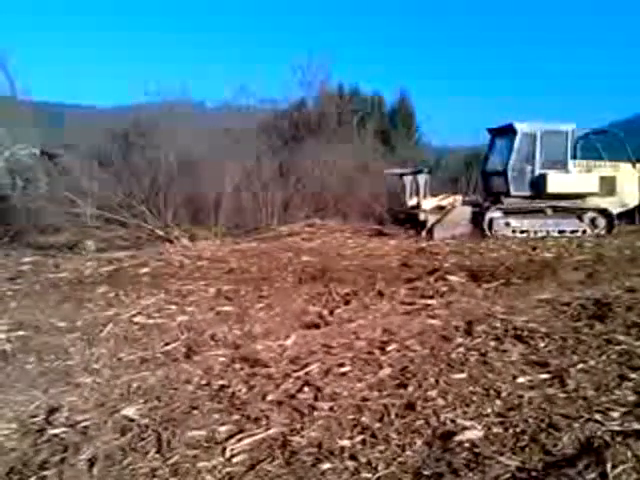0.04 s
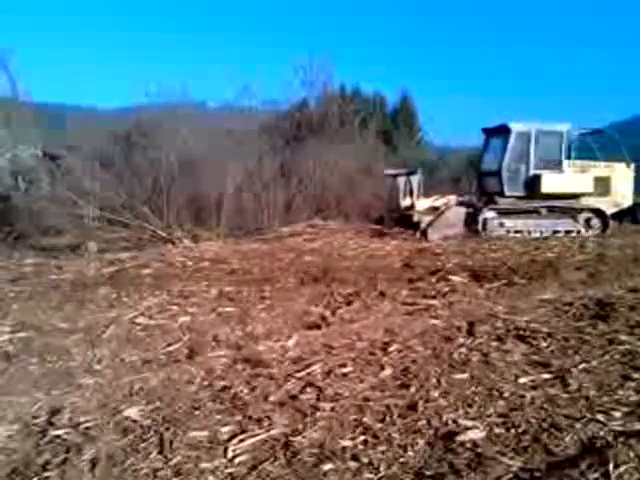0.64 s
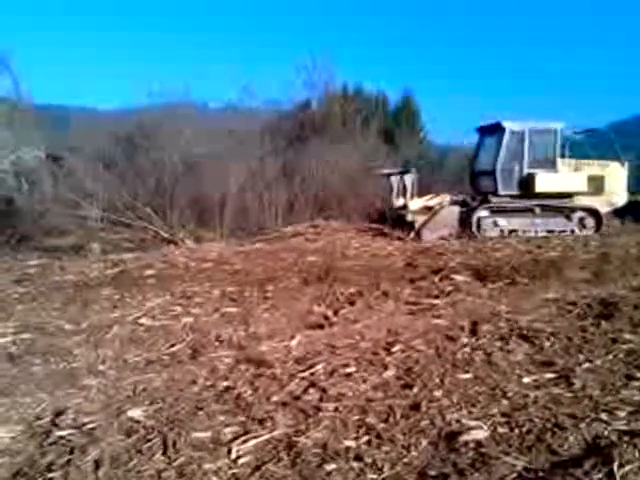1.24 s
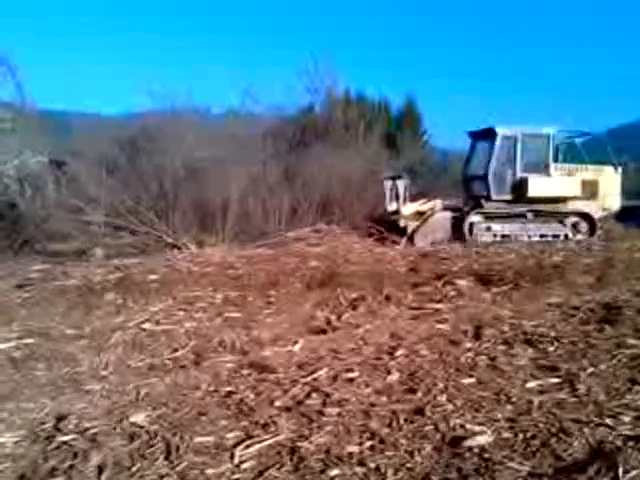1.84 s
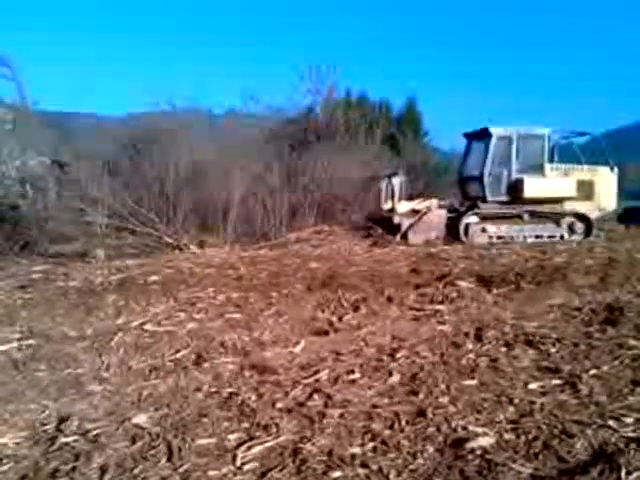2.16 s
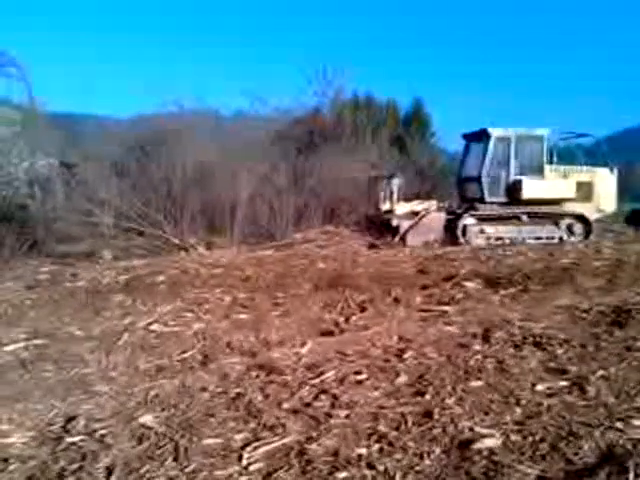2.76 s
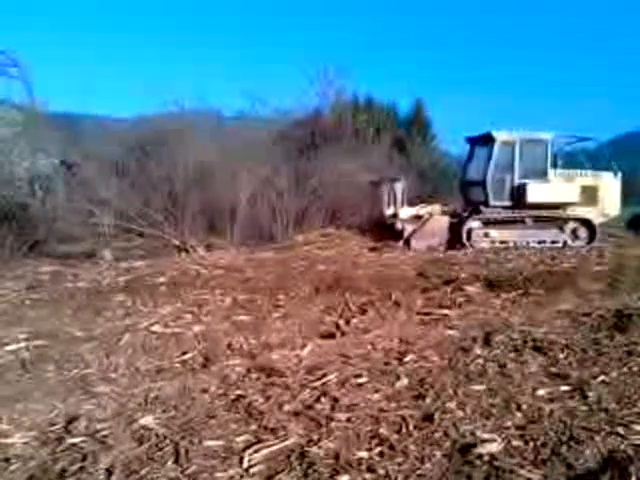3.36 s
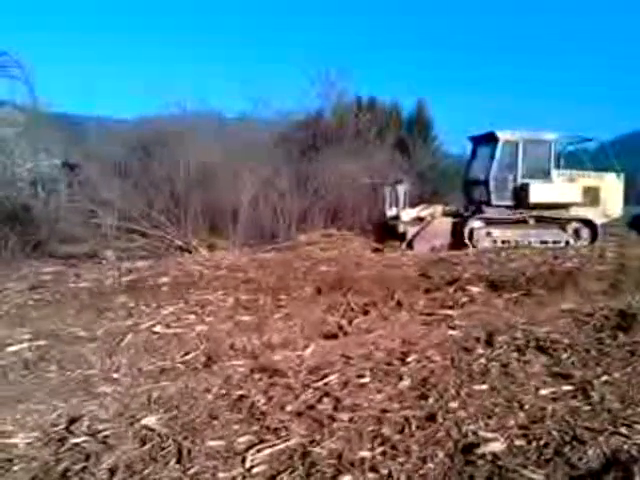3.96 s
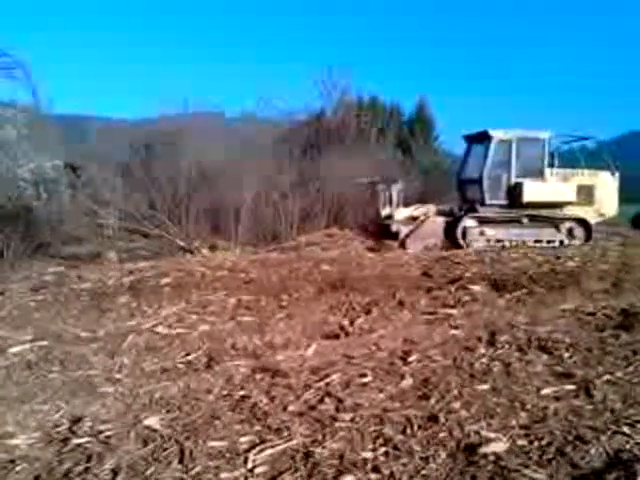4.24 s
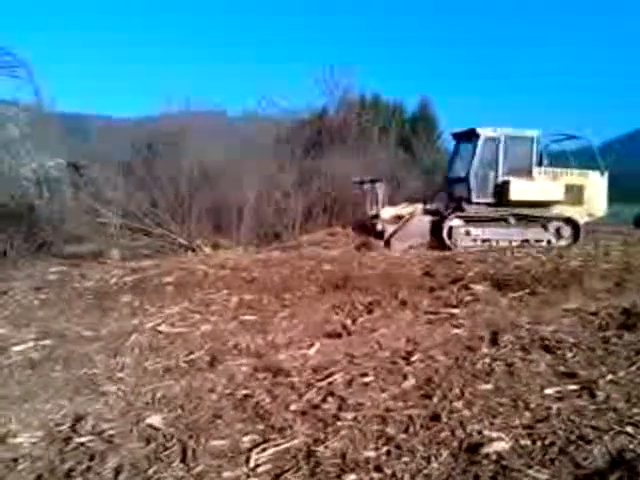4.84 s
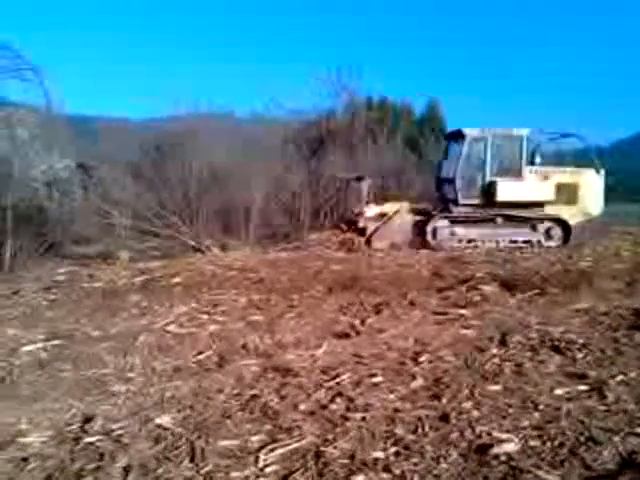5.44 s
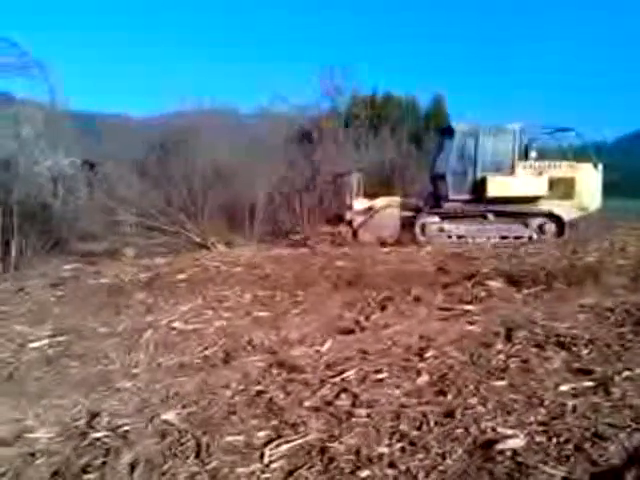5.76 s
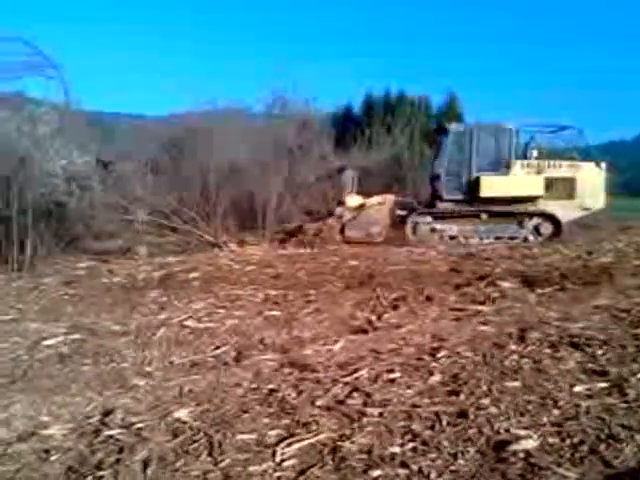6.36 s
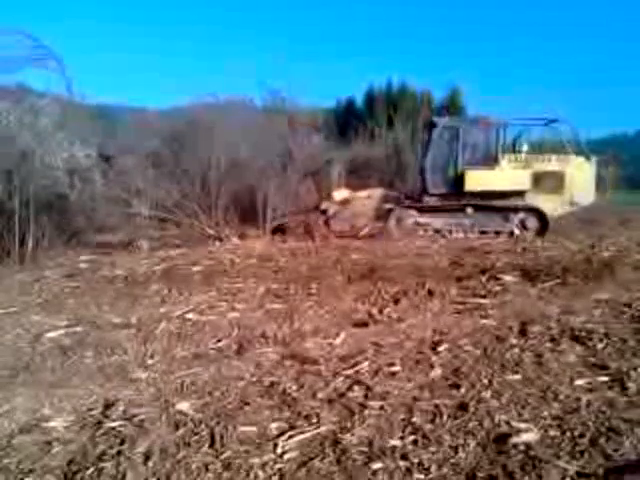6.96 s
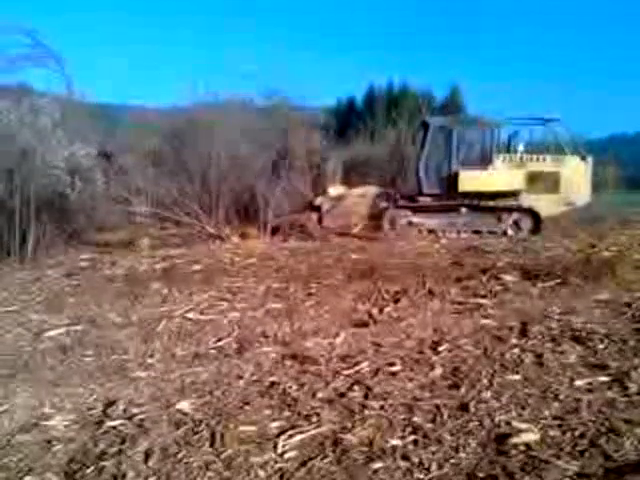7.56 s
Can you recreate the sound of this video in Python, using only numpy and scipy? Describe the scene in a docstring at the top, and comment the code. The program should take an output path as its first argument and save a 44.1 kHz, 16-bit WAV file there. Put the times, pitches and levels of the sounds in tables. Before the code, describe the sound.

Heard from a distance outdoors, a heavy diesel mulcher roars continuously while chewing wood into crackling, clattering chips. After a flurry of sharp snaps the engine bogs down, climbs back to speed, then drops again. A second heavy cluster of cracks and faint groaning stems follow, and the engine ends low and straining. The microphone sounds telephone-like, with brief fizz on the loudest cracks.

```python
"""A tracked forestry mulcher grinding brush, heard from some way off across an open field.
Its teeth shred wood in a dense crackle with single sharp cracks; loose pieces clatter and thick
stems groan under the hood. Behind that the six-cylinder diesel drones and sags as the rotor bites,
and the cooling fan, geared to the crank, sings along. One microphone, narrow-band: above about
4 kHz are a trace of hiss and brief ticks and fizz of recorder distortion at the loudest cracks."""
import sys
import numpy as np
from scipy import signal
from scipy.fft import rfft, irfft
from scipy.io import wavfile

SR = 44100
rng = np.random.default_rng(int(sys.argv[2]) if len(sys.argv) > 2 else 0)


def dump_mix(stems):
    """Bounce the given channels to the path in sys.argv[1] as a 16-bit WAV at rate SR."""
    frames = np.atleast_2d(stems).T  # one column per channel
    limited = np.clip(frames, -1, 1)  # hard clip at full scale
    pcm = np.round(limited * 32767).astype(np.int16)
    wavfile.write(sys.argv[1], SR, pcm)


N = 334719
TIME = np.arange(N) / SR
LOUD_DRONE_DB = -19.5   # reference level of the low drone

# Wood cracking against the teeth. Each row: start in seconds, level in dB, ring of the stem in Hz,
# level of the recorder's treble distortion in dB.
STEM_CRACKS = [(0.5005, -15, 1510, -80), (1.1466, -10, 1960, -78), (1.166, -8.5, 2150, -79),
               (1.174, -13, 2900, -80), (1.1998, -9, 2850, -80), (1.4738, -12, 1560, -80),
               (1.8617, -15, 1460, -82), (2.127, -5, 2130, -50), (2.1507, -7, 2260, -41),
               (2.177, -3, 2260, -39), (2.1915, -13, 2630, -51), (2.212, -7, 1990, -76),
               (2.2865, -9.5, 3020, -77), (2.3787, -10, 1980, -79), (2.4571, -8, 2150, -34.5),
               (2.4655, -17, 3000, -47), (2.4818, -8, 3060, -56), (2.5005, -6, 2000, -64),
               (2.525, -7.5, 1900, -71), (2.586, -5, 1900, -77), (2.6046, -10, 1950, -71),
               (2.6145, -10, 3220, -66), (2.65, -7, 2240, -59.5), (2.68, -10, 2200, -43),
               (2.689, -8, 2000, -42.5), (2.92, -13.5, 3420, -74), (2.973, -11, 2070, -74),
               (3.015, -19, 2110, -80), (3.2913, -16, 1510, -87), (4.476, -9, 2050, -44),
               (4.51, -16, 2100, -47), (4.518, -17, 2100, -47), (4.5286, -5, 2030, -44),
               (4.5595, -5.5, 2180, -69), (4.5929, -9, 2070, -83.5), (4.621, -5, 2300, -84.5),
               (4.8164, -10.5, 2180, -86), (5.0927, -8.5, 2500, -87), (5.2113, -5.5, 3060, -68),
               (5.2152, -6, 1400, -72), (5.4884, -7, 2110, -73), (5.574, -7, 2180, -55),
               (5.608, -10, 2286, -41), (5.618, -11, 2300, -48), (5.6336, -9, 1830, -44),
               (5.651, -10, 2220, -55), (5.748, -10, 2400, -55), (5.7655, -8, 2240, -61),
               (5.8767, -8.5, 1980, -45), (5.887, -14, 2200, -43), (5.9043, -6, 2240, -42),
               (5.9342, 0, 2900, -33), (5.9433, -15, 3680, -48), (5.952, -5, 2280, -51),
               (5.9707, -6, 2310, -46), (5.998, -10, 2800, -46), (6.017, -10, 3020, -61),
               (6.0303, -9, 2350, -58), (6.174, -11, 2000, -72), (6.191, -5, 1390, -77),
               (6.221, -10, 2300, -72), (6.312, -18, 2210, -80), (6.551, -8.5, 1200, -83)]


def from_db(db):
    """Decibels to gain."""
    return 10 ** (np.asarray(db) / 20)


def rms_one(x):
    """Scale to an rms of 1."""
    return x / np.sqrt(np.mean(x ** 2) + 1e-20)


def in_time(rows):
    """Join rows of (seconds, value) into a curve with a value for every sample."""
    return np.interp(TIME, *np.transpose(rows))


def drift(rate):
    """A smooth random wander of spread 1 that changes about `rate` times a second."""
    step, settle = 40, 2000
    pole = np.exp(-2 * np.pi * step * rate / SR)
    noise = rng.standard_normal(N // step + settle + 2)
    slow = signal.lfilter([1], [1, -2 * pole, pole * pole], noise)[settle:]
    return np.interp(np.arange(N) / step, np.arange(len(slow)), rms_one(slow))


def coloured(x, spectrum, size=8192):
    """Give a signal a spectrum through a causal (minimum-phase) filter; rms 1."""
    hz, db = np.transpose(spectrum)
    grid = np.maximum(np.arange(size // 2 + 1) * SR / size, 1)
    gain = from_db(np.interp(np.log(grid), np.log(hz), db))
    cepstrum = irfft(np.log(gain))[:size // 2]
    cepstrum[1:] *= 2
    impulse = irfft(np.exp(rfft(cepstrum, size)))
    return rms_one(signal.fftconvolve(x, impulse)[:N])


def ring(clicks, hz, t60):
    """A unit click sets a sine of height 1 ringing; it falls 60 dB in t60 seconds."""
    r, w = from_db(-60 / (t60 * SR)), 2 * np.pi * hz / SR
    return signal.lfilter([0, np.sin(w)], [1, -2 * r * np.cos(w), r * r], clicks + 1e-18)


def ground_dip(x, hz=2610, width_hz=260, depth=0.58):
    """Sound off the ground meets the direct sound at the microphone and hollows out one treble band."""
    return x - depth * signal.lfilter(*signal.iirpeak(hz, hz / width_hz, fs=SR), x)


def narrow_band(x, edge_hz=3798, rate_hz=8000, smoothing_hz=3880, ceiling=.6):
    """The recorder's telephone-wide band: highest peaks flattened, top mirrored faintly past the edge."""
    band = signal.sosfilt(signal.butter(30, edge_hz, fs=SR, output="sos"), x)
    mirrored = np.clip(band, -ceiling, ceiling) * (1 + 2 * np.cos(2 * np.pi * rate_hz * TIME))
    smoothing = signal.firwin(115, smoothing_hz, window=("kaiser", 6), fs=SR)
    return signal.fftconvolve(mirrored, smoothing, "same")


def distortion(delay_s=0.0018, tick_s=0.00054, fizz_db=-10, fade_s=.016, tone_hz=6000, tone_t60=0.00096):
    """Brief treble ticks and fizz of recorder distortion at the loudest cracks."""
    out, t = np.zeros(N), TIME[:SR // 10]
    ragged = rms_one(from_db(-drift(200)))
    treble = signal.butter(8, [4300, 8000], "band", fs=SR, output="sos")
    for start, _, _, db in STEM_CRACKS:
        span = slice(int(start * SR), int(start * SR) + len(t))
        hz = tone_hz * (1 + 0.12 * rng.uniform(-1, 1))
        tinted = ring(rng.standard_normal(2 * len(t)), hz, tone_t60)
        hiss = rms_one(signal.sosfilt(treble, tinted)[len(t):])
        tick = np.exp(-((t - delay_s) / tick_s) ** 2)
        fizz = from_db(fizz_db) * np.minimum(t / delay_s, 1) * np.exp(-t / fade_s) * ragged[span]
        out[span] += from_db(db) * (tick + fizz) * hiss
    return out


def faint_hiss(work_db, hiss_db=-77, follows=0.62, flicker_db=2.5):
    """A faint hiss above the main band rises with the work."""
    # Colour of the hiss. Each row: frequency in Hz, relative level in dB.
    spectrum = [(3000, -9.5), (4600, -2), (5300, 3), (6200, -5.5), (9000, -4), (11500, -1.5), (13800, 2.5),
                (15500, 0.5)]
    level_db = hiss_db + follows * (work_db - np.mean(work_db)) + flicker_db * drift(40)
    return from_db(level_db) * coloured(rng.standard_normal(N), spectrum)


def rumble(drone_db, level_db=-27.0, follows=0.22):
    """Low rush of exhaust gas, rotor and tracks, swelling a little with the drone."""
    # Colour of the rush. Each row: frequency in Hz, relative level in dB.
    spectrum = [(20, -25), (45, -7), (70, -4.5), (110, -0.5), (150, 2), (190, -4), (225, -11.5),
                (290, -4.5), (400, -3), (520, -2.5), (800, -15), (2000, -41.5)]
    gain = from_db(level_db + follows * (drone_db - LOUD_DRONE_DB))
    return gain * coloured(rng.standard_normal(N), spectrum)


def roar(firings, rotor_octaves, base_db=-19.0, db_per_octave=12, throb_db=0.5, flutter_db=0.62):
    """Combustion clatter swells with every firing and rings in the engine housing."""
    # Resonances of the housing. Each row: frequency in Hz, relative level in dB.
    housing = [(150, -34.5), (350, -9.5), (480, -5.5), (600, -7), (720, -3), (850, 0.2), (1020, -4),
               (1230, -6.5), (1430, -4.5), (1700, -9.5), (2000, -5.5), (4000, -16.5)]
    approach_db = 0.3945 * TIME   # the machine creeps towards the microphone
    level_db = base_db + db_per_octave * rotor_octaves + approach_db
    beat = from_db(throb_db * np.cos(2 * np.pi * firings) + flutter_db * drift(26))
    return from_db(level_db) * coloured(rng.standard_normal(N) * beat, housing)


def fan(firings, strain, cycles_per_firing=13 / 3, waver_db=1.0, shake=0.13):
    """The blade tone flutters in the turbulent intake air and turns rough when the engine labours."""
    # The blade tone, sinking away under heavy work. Each row: time in seconds, level in dB.
    levels = [(0, -28.5), (2.45, -28), (2.78, -27), (2.95, -49), (3.45, -39.5), (3.7, -26), (3.95, -30.5),
              (4.3, -28), (4.55, -35), (4.85, -40), (5.1, -27.5), (5.5, -28.5), (5.7, -33), (6.2, -33),
              (6.5, -40)]
    cycles = cycles_per_firing * firings + .018 * drift(10) + shake * strain * drift(25)
    gain = from_db(in_time(levels) + waver_db * drift(3.7))
    return np.sqrt(2) * gain * np.sin(2 * np.pi * cycles)


def exhaust(firing_hz, firings, drone_db, strain, waver_db=0.5, overtone_waver_db=1.5, smother_db=0.7):
    """Tones on the firing rate glide through the pipe's resonances; strain roughens and dulls them."""
    # Exhaust tones; unequal cylinders add the fractions. Each row: multiple of the firing rate,
    # level in dB against the loud drone, factor by which it follows the drone's swings.
    orders = [(1 / 2, -23, 0.87), (1, 0, 0.96), (3 / 2, -17, 1.5), (2, -9.5, 0.83), (5 / 2, -15, 1.5),
              (8 / 3, -21.5, 1), (3, -11.5, 0.91), (7 / 2, -19.5, 0.44), (4, -16.5, 0.73),
              (9 / 2, -24, 0.97), (5, -28, 1), (11 / 2, -23, 0.79), (6, -18, 1), (13 / 2, -15.5, 0.7),
              (15 / 2, -22.5, 0.82), (7.7, -15, 1)]
    # Resonances of the exhaust pipe. Each row: frequency in Hz, gain in dB.
    pipe = [(50, 3), (80, 0.5), (125, -1), (170, 3.5), (205, -3.5), (232, -1), (280, 2), (315, 0.5),
            (350, -1.5), (400, -2.5), (560, 4.5), (900, -9)]
    out = 0
    uneven = firings + .004 * drift(14)
    for order, db, follows in orders:
        swell_db = LOUD_DRONE_DB + follows * (drone_db - LOUD_DRONE_DB)
        waver = (waver_db if order == 1 else overtone_waver_db) * drift(5)
        pipe_db = np.interp(order * firing_hz, *np.transpose(pipe))
        smothered = smother_db * strain * max(order - 3, 0)
        gain = from_db(db + swell_db + pipe_db + waver - smothered)
        rough = .05 * np.clip(order - 1.5, 0, 2.5) * strain * drift(22)
        out += gain * np.sin(2 * np.pi * (order * uneven + rough + rng.random()))
    return np.sqrt(2) * out


def groans(width=.055, wander=.03):
    """Each rub swells and fades in one resonance, whose pitch wanders as the stem shifts."""
    # Thick stems dragging under the hood. Each row: middle in seconds, length in seconds,
    # pitch in Hz, level in dB.
    drags = [(0.09, 0.09, 971, -21), (5.985, 0.17, 659, -24.5), (5.794, 1.2, 816, -31),
             (6.192, 0.32, 757, -23.5), (6.412, 0.18, 237.7, -26.5), (6.8, 0.59, 1227, -29)]
    out = 0
    for middle, length, hz, db in drags:
        swell = np.cos(np.pi * np.clip((TIME - middle) / length, -.5, .5))
        phase = 2 * np.pi * np.cumsum(hz * (1 + wander * drift(5))) / SR
        rub = drift(width * hz * 2) * np.cos(phase) + drift(width * hz * 2) * np.sin(phase)
        out += from_db(db) * swell * rub
    return out


def clatter(chew_db, knocks_per_s=55, offset_db=-9.0, spread_db=5.5, ring_cycles=32, pieces=24):
    """Loose pieces of wood knock together at random, each ringing briefly at a pitch of its own."""
    at = rng.integers(0, N, int(knocks_per_s * N / SR))
    sizes = from_db(rng.uniform(-spread_db, spread_db, len(at)))
    piece = rng.integers(0, pieces, len(at))
    rings = 0
    for k, hz in enumerate(np.geomspace(1000, 3400, pieces)):
        knocks = np.bincount(at, sizes * (piece == k), N)
        rings += ring(knocks, hz, ring_cycles / hz)
    return from_db(chew_db + offset_db) * rms_one(rings)


def cracks(splinter=0.16, splinter_s=0.0013, stem_db=7, stem_t60=0.0105, snap_s=.003, crest=1.7):
    """A stem breaks with a snap and a short splintering that ring both the stem and the rotor hood."""
    # Modes of the hood. Each row: frequency in Hz, relative level in dB, seconds to fall 60 dB.
    hood_modes = [(655, -12.5, 0.029), (860, -10, 0.013), (1188, -15.5, 0.022), (1510, -16, 0.028),
                  (1980, 5.5, 0.0025), (2384, 10.5, 0.0047), (2900, -2.5, 0.008), (3820, -1.5, 0.011)]
    out, t = np.zeros(N), TIME[:SR // 20]
    for start, level_db, stem_hz, _ in STEM_CRACKS:
        force = (t == 0) + splinter * rng.standard_normal(len(t)) * np.exp(-t / splinter_s)
        hood = sum(ring(force, hz, t60) * from_db(db + 2 * rng.standard_normal()) * (-1) ** k
                   for k, (hz, db, t60) in enumerate(hood_modes))
        blow = from_db(stem_db) * ring(force, stem_hz, stem_t60) - hood
        rough_peak = crest * np.std(blow[t < snap_s])
        at = int(start * SR)
        out[at:at + len(t)] += from_db(level_db) * blow / rough_peak
    return out


def wood_feed(rotor_octaves, litter_chew_db=-24.5, litter_chips_db=-30, db_per_octave=12.5, ramp_s=.19):
    """Chewing and chip levels in dB: litter follows the rotor's speed; bites swell, hold and fade."""
    # The rotor bites into brush. Each row: start in seconds, length in seconds, chewing of wood in dB,
    # spray of chips in dB.
    bites = [(0.0, 0.12, -24.5, -29), (0.152, 0.07, -18, -27.5), (0.362, 0.14, -24, -32),
             (0.861, 0.19, -21.3, -34), (1.107, 0.08, -26.5, -26), (1.201, 0.12, -23.5, -34.5),
             (1.976, 0.19, -24.5, -26), (2.311, 0.18, -18.5, -22.5), (2.486, 0.37, -20, -28.5),
             (2.802, 0.21, -18, -30.5), (4.114, 0.69, -22.5, -30), (4.86, 0.63, -22, -28),
             (5.43, 0.35, -25, -26.5), (5.8, 0.16, -20.5, -24.5), (6.049, 0.28, -23.5, -29.5),
             (6.655, 0.21, -24, -31)]
    flow_db = db_per_octave * rotor_octaves
    chew_power = from_db(litter_chew_db + flow_db) ** 2
    chips_power = from_db(litter_chips_db + flow_db) ** 2
    for start, length, chew_db, chips_db in bites:
        ramp = min(ramp_s, length)
        attack = np.clip((TIME - start) / ramp, 0, 1)
        release = np.exp(-np.maximum(TIME - start - length, 0) / ramp)
        chew_power += (from_db(chew_db) * attack * release) ** 2
        chips_power += (from_db(chips_db) * attack * release) ** 2
    return 10 * np.log10(chew_power), 10 * np.log10(chips_power)


def crackle(level_db, spectrum, snaps_per_s, size_db, hiss):
    """Tiny snaps of uneven size, more of them when the work is harder, over a blur of finer ones."""
    born = rng.random(N) < snaps_per_s * from_db(level_db - np.mean(level_db)) / SR
    sizes = from_db(size_db * np.minimum(rng.exponential(1, N), 3.2))
    snaps = rms_one(born * sizes * rng.choice([-1, 1], N))
    return from_db(level_db) * coloured(snaps + hiss * rng.standard_normal(N), spectrum)


def shredding(firings, chew_db, chips_db, turns_per_firing=.345, turn_db=1.53, clumps_per_s=130):
    """Fibres tear and chips fly in brief clumps and uneven surges, hardest once per rotor turn."""
    # Colours of tearing fibres and of flying chips. Each row: frequency in Hz, relative level in dB.
    chew_spectrum = [(400, -22.5), (900, -24), (1250, -5), (1500, -1.5), (1800, -0.5), (2250, 1.5),
                     (2450, -2.5), (2700, -5), (3200, -21), (4400, -30)]
    chips_spectrum = [(1500, -26), (2400, -15.5), (2750, 0), (3020, 7), (3250, -3), (3650, 1), (4400, -11)]
    surge_db = turn_db * np.cos(2 * np.pi * turns_per_firing * firings) + 0.5 * drift(33)
    chewing = crackle(chew_db - 2.0, chew_spectrum, snaps_per_s=2600, size_db=3.5, hiss=0.39)
    chips = crackle(chips_db + 1.5, chips_spectrum, snaps_per_s=2400, size_db=3.0, hiss=0.11)
    chew_clumps = rms_one(from_db(surge_db + drift(clumps_per_s)))
    chips_clumps = rms_one(from_db(surge_db + 1.5 * drift(clumps_per_s)))
    return chewing * chew_clumps + chips * chips_clumps


def scene(free_firing_hz=116, full_strain_sag_hz=15, rotor_lag_s=.15):
    """The mulcher from across the field: engine speed drives diesel and rotor; bites feed shredding."""
    # Engine speed, sagging where the rotor bites deep. Each row: time in seconds, firings per second.
    speed = [(0.0, 116.1), (1.35, 115.2), (1.98, 116.9), (2.47, 116.0), (2.73, 104.7), (3.03, 83.5),
             (3.15, 80.8), (3.63, 107.3), (3.89, 116.6), (4.09, 119.1), (4.25, 117.0), (4.5, 96.3),
             (4.62, 93.7), (5.02, 101.4), (5.38, 105.9), (5.79, 107.2), (6.2, 103.7), (6.45, 90.2),
             (6.82, 93.6), (7.04, 85.5), (7.29, 83.2), (7.59, 90.7)]
    # Loudness of the low drone, with two brief dips. Each row: time in seconds, level in dB.
    drone_levels = [(0.0, -29.5), (0.23, -28.5), (0.36, -26.5), (1.24, -26), (1.31, -32), (1.33, -26),
                    (1.67, -25), (1.73, -30.5), (1.92, -24.5), (2.16, -29), (2.24, -25.5), (2.43, -27.5),
                    (2.64, -21.5), (3.21, -29), (3.4, -22.5), (3.93, -22.5), (3.97, -26.5), (4.42, -25),
                    (4.46, -24), (5.03, -22.5), (5.35, -21), (5.96, -20), (6.28, -19), (6.41, -25),
                    (6.89, -19.5), (7.04, -25), (7.48, -25), (7.59, -23.5)]
    firing_hz, drone_db = in_time(speed), in_time(drone_levels)
    firings = np.cumsum(firing_hz) / SR
    strain = np.clip((free_firing_hz - firing_hz) / full_strain_sag_hz, 0, 1)
    lagged_hz = np.interp(TIME - rotor_lag_s, TIME, firing_hz)   # the heavy rotor trails the engine
    rotor_octaves = np.log2(lagged_hz / free_firing_hz)
    chew_db, chips_db = wood_feed(rotor_octaves)
    tones = exhaust(firing_hz, firings, drone_db, strain) + fan(firings, strain)
    diesel = tones + rumble(drone_db) + roar(firings, rotor_octaves)
    wood = shredding(firings, chew_db, chips_db) + clatter(chew_db) + cracks() + groans()
    return (narrow_band(ground_dip(diesel + wood)) + distortion() + faint_hiss(chips_db))[None]


def record(dry):
    """The microphone's signal is cut steeply above 15.7 kHz."""
    return signal.sosfilt(signal.ellip(8, .1, 60, 15700, fs=SR, output="sos"), dry)


dry = scene()
out = record(dry)
dump_mix(out)
```